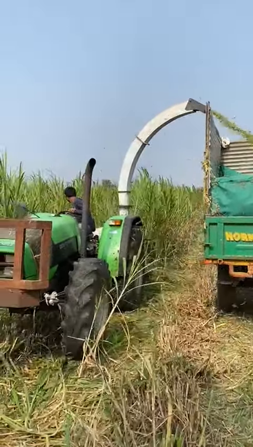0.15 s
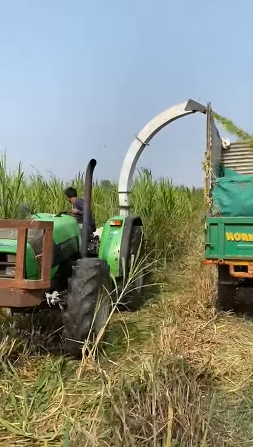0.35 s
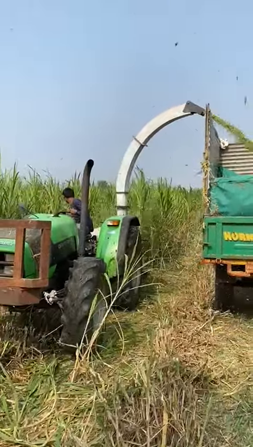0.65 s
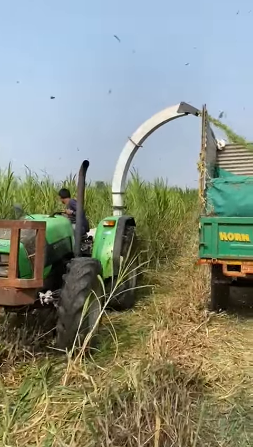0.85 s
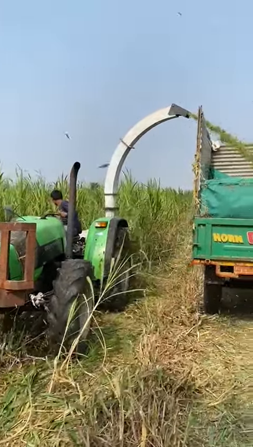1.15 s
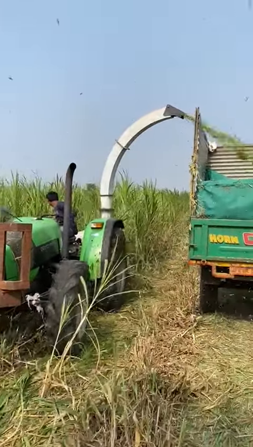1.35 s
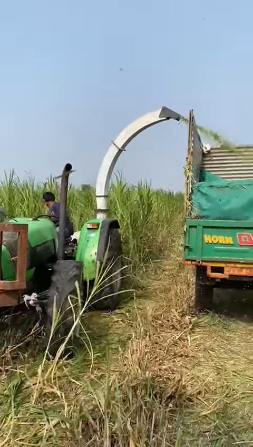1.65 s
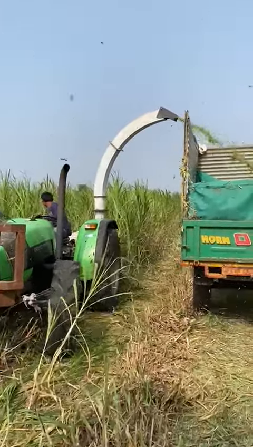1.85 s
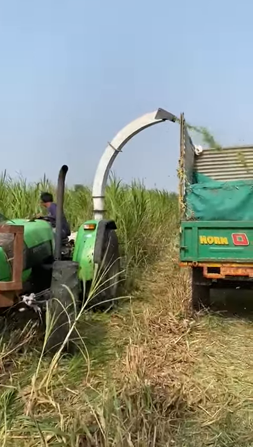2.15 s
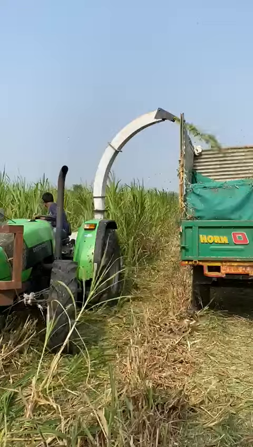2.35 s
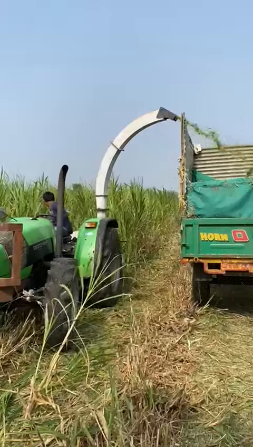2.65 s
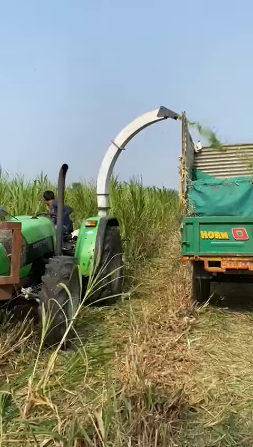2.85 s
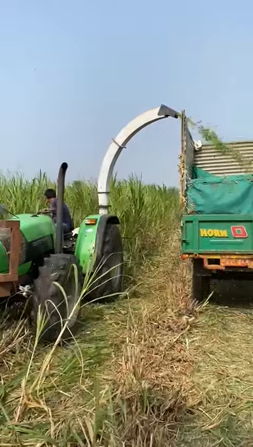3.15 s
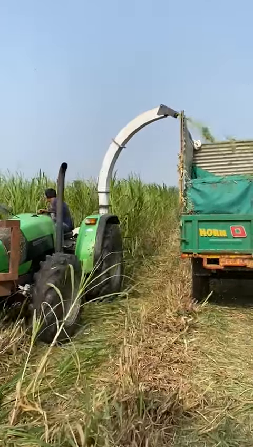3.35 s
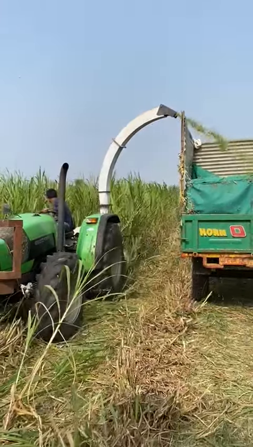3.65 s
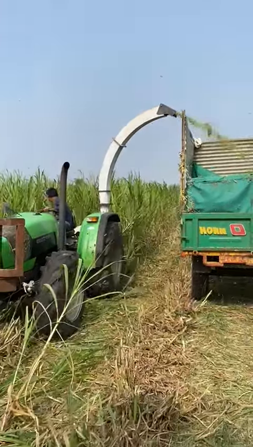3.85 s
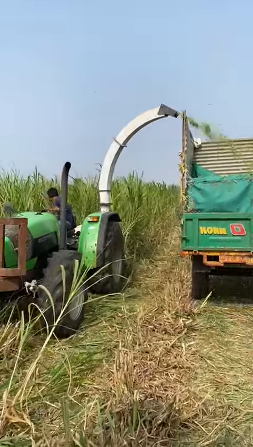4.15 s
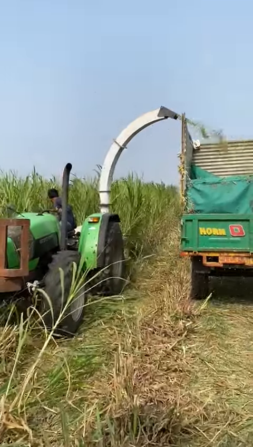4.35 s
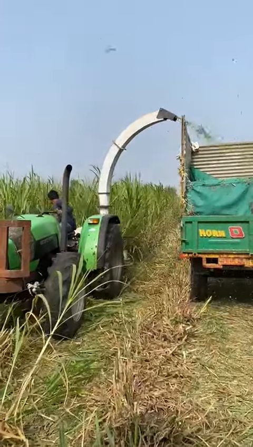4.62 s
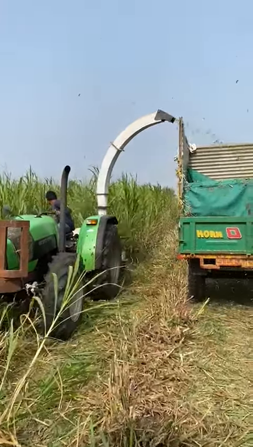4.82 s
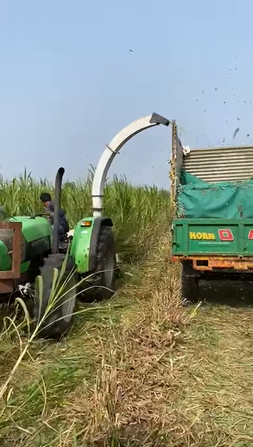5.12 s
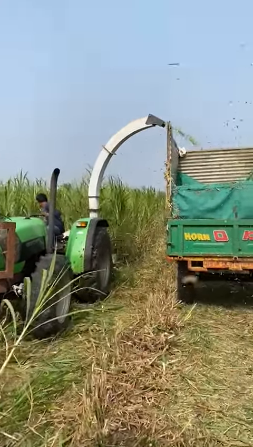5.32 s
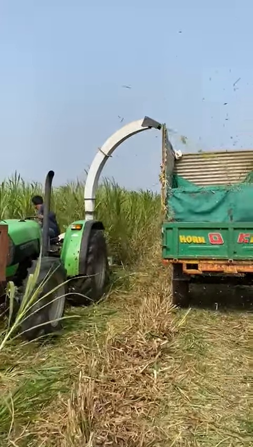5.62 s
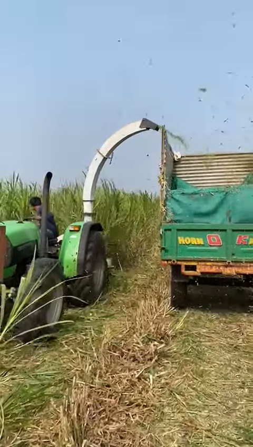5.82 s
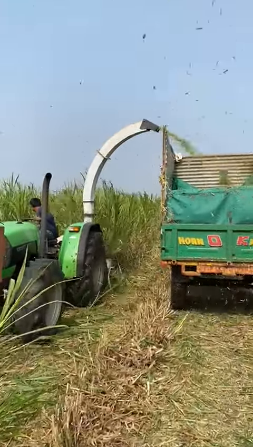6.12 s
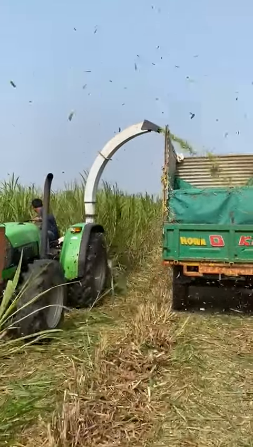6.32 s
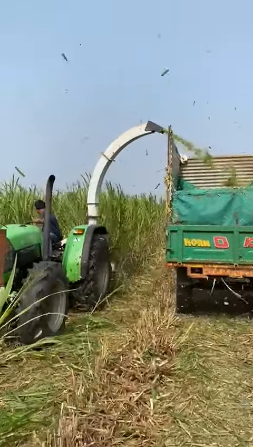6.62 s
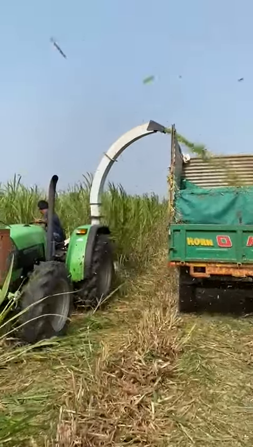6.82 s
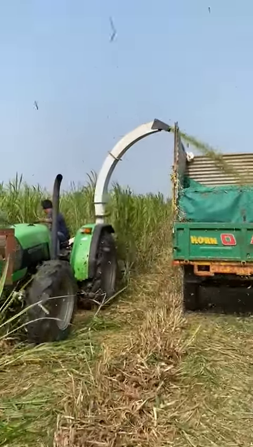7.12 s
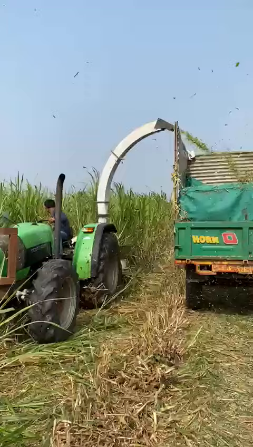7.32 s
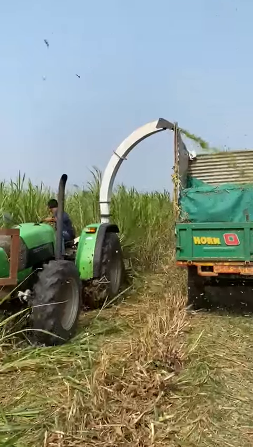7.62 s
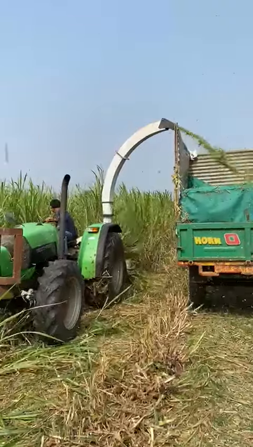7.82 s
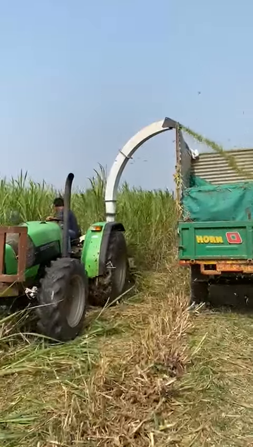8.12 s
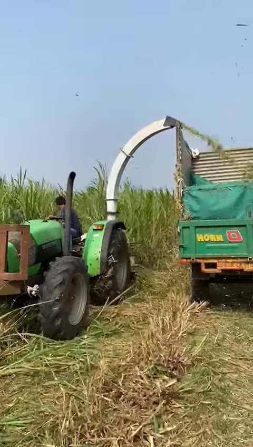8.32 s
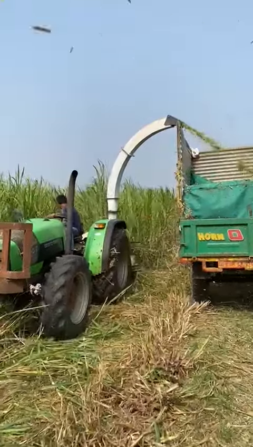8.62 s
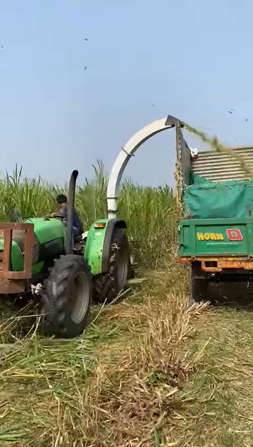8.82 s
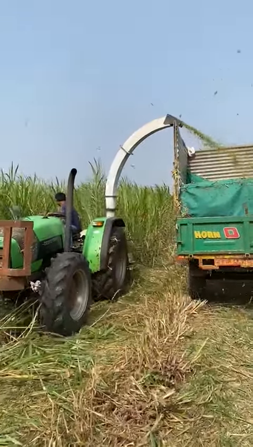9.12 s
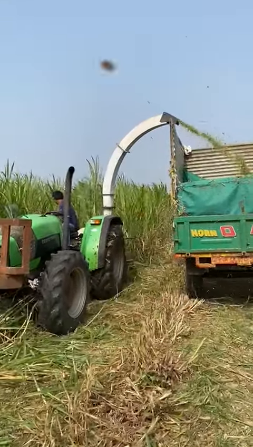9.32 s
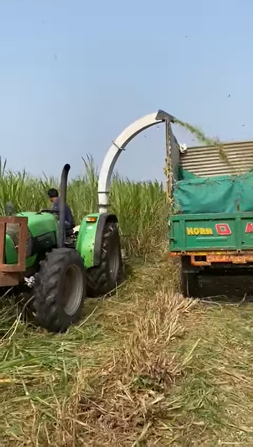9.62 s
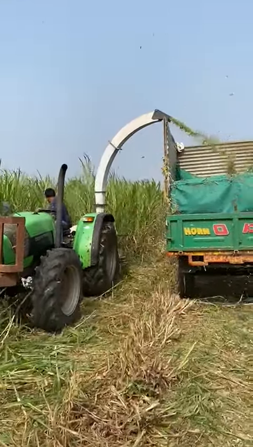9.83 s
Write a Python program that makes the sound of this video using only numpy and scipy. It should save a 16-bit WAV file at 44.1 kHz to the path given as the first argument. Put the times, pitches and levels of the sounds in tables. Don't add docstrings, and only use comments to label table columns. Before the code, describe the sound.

A tractor diesel drones under load while a chopper drum hums, air hisses, and shredded crop patters and rings up a steel spout in clumps.

```python
import sys
import numpy as np
from scipy import signal
from scipy.io import wavfile
from scipy.ndimage import uniform_filter1d, minimum_filter1d

SR = 44100
rng = np.random.default_rng(int(sys.argv[2]) if len(sys.argv) > 2 else 0)


def int16_out(signal):
    q = np.round(np.clip(np.atleast_2d(signal).T, -1, 1) * 32767)
    wavfile.write(sys.argv[1], SR, q.astype(np.int16))


def volts_from_decibels(level):
    exponent = np.asarray(level, float) / 20
    return 10 ** exponent


N = 439677
TIME = np.arange(N) / SR

# time in seconds, firings per second.
ENGINE_SPEED = [(0, 68.1), (.5, 67.08), (1, 66.5), (2, 66.93), (2.5, 67.56), (3.5, 68.46), (4, 69.14),
                (4.5, 70.34), (5, 71.75), (5.5, 72.41), (6, 72.39), (6.5, 71.62), (7, 70.64), (7.5, 70.54),
                (8, 69.9), (8.5, 69.37), (9, 68.9), (10, 68.85)]
FIRING_MULTIPLES = 1, 2, 3, 4, 5, 7, 8
# level in dB, share of effort, share of lean, share of the
# lowest tone's rise and fall, trembling in dB.
EXHAUST_TONES = [(-30.5, 0.1, .01, .99, -0.4), (-42, 1.8, -1.2, -.9, 1), (-26, 0.85, 0.51, .01, 0.1),
                 (-30, .99, -0.9, .01, 0), (-41, 0.24, -1, -0.019, 1.5), (-42, 0.38, 0.81, -0.09, 1.7),
                 (-37.5, -.3, -0.28, -.2, -0.4)]
# time in seconds, effort in dB, lean from the second, fourth and fifth multiples to
# # the third and seventh in dB, rise and fall of the lowest tone's level in dB.
EXHAUST_MOOD = [(.2, -0.5, 1.5, .6), (.6, 1.5, .6, -8), (1, 0, -1.5, 0.5), (1.5, -1, -2, 1),
                (2.15, -1, .6, 2.5), (2.6, -1.5, .8, -0.5), (3.75, 1, 3.5, 4), (4.4, -1, -3.5, -1),
                (5.2, 0, -6, 0.5), (5.8, 2.5, -5, 0.5), (6.7, 3, -1, -4.5), (7.5, 0, 0, -1),
                (8.1, -1, -0.7, -0.5), (8.75, -0.1, 2, 2.5), (9.3, -2.2, 1.5, 0), (9.9, -5.5, 0.5, -2)]
# multiple of the four-firing cycle, level in dB.
CYCLE_TONES = [(3, -47), (5, -49), (6, -49), (9, -48), (11, -49), (13, -47), (15, -45), (17, -47),
               (19, -48), (24, -44), (35, -49), (36, -45), (40, -46), (44, -52), (48, -48), (52, -50)]
# frequency in Hz, density in dB per Hz.
ROAR_SPECTRUM = [(20, -34), (40, -24), (58, -12), (100, -6), (170, -3), (245, -8.5), (400, -4), (560, -5.5),
                 (735, -6), (790, -8.5), (1500, -12), (2400, -15.5), (3000, -19.5), (4000, -43)]

# time in seconds, level in dB.
KNIFE_HUM = [(0, -28), (1.5, -32.5), (3, -29), (4.5, -29), (6, -30.5), (7.5, -26.5), (9, -28), (10, -26)]
# multiple of the drum's turns per second, level in dB, wavering in % of pitch.
DRUM_TONES = [(4, -44, .1), (7, -40, .1), (9, -43, .1), (12, -41, .1), (13, -45, .1), (14, -50, .1),
              (17, -41, .1), (18.9, -42, .3), (21, -44, .3), (40.2, -42, .4), (42, -44, .4)]
# frequency in Hz, density in dB per Hz.
HISS_SPECTRUM = [(1500, -14), (2600, -3), (3300, 0), (4300, 0), (5300, -2), (6000, -3), (6600, -4),
                 (7200, -5), (7800, -6), (8400, -8), (9100, -11), (10500, -10), (11500, -13), (12200, -20)]
# time in seconds, strength in dB.
BLOWER_STRENGTH = [(0, 1.9), (.7, -0.5), (1.5, .4), (2.1, 1), (2.4, -0.5), (3.4, 1.4), (4.1, -1.5),
                   (4.75, -2.5), (5, 0), (5.45, 3), (5.8, 1.5), (6.5, 3.5), (7.2, 2.5), (7.5, 1.5),
                   (7.75, 4), (8.8, 3), (9.5, -0.3), (9.97, 0.9)]

# time in seconds, load in dB.
CROP_LOAD = [(0, 2), (.7, 0.5), (1.15, -2.5), (1.19, 3.5), (1.6, 4), (2.1, 3), (2.45, 1), (2.9, -3.5),
             (3.55, 0.5), (4.3, 1), (4.75, -6.5), (5.6, -1.5), (6.4, 4.5), (6.68, 0.5), (6.74, 4.5),
             (7.22, 3.5), (7.4, -1.5), (8.6, 2.4)]
# start in seconds, hold in seconds, swell in dB.
CROP_CLUMPS = [(.03, 0.065, -3), (0.783, 0.039, 4), (1.186, 0.049, 4.5), (1.364, 0.2, 3), (1.552, .06, 6.5),
               (1.765, .04, 4.5), (1.86, .05, 6), (1.98, 0.02, 4.5), (2.06, 0.036, 5.5), (2.447, .05, 4),
               (3.133, 0.036, 9), (3.3, 0.036, 4), (3.53, 0.12, 7.5), (3.77, .02, 3), (3.848, .02, 3),
               (3.933, 0.037, 11.5), (4.03, 0.018, 6), (4.21, .025, 11.5), (4.437, 0.032, 9),
               (5.42, 0.035, 12.5), (6.025, 0.018, 3.5), (6.153, .03, 3), (6.554, 0.029, 6),
               (6.742, 0.038, 7.5), (6.864, 0.03, 4), (7.036, 0.022, 2), (7.35, .02, 5), (7.89, .02, 4),
               (7.958, 0.053, 7), (8.974, 0.092, 2.5)]
# frequency in Hz, width in Hz, level in dB.
PATTER_MODES = [(820, 370, -3.5), (1190, 500, 1.5), (1600, 470, -1), (2050, 460, -2.5), (2570, 160, -11)]
# frequency in Hz, width in Hz, level in dB.
STEEL_MODES = [(1150, 200, -9), (1900, 150, -9), (2200, 140, 0), (4160, 350, -5.5), (4900, 400, -18)]
# time in seconds, peak level in dB, splinter brightness in dB.
STALK_KNOCKS = [(0.1456, -16.5, -17), (1.1772, -27, -12), (1.29, -18, -18), (1.4207, -22, -17),
                (1.7699, -7, -24), (1.9834, -15, -15), (2.2094, -26, -24), (2.9287, -26, -17),
                (3.1113, -22, -13), (3.3044, -20, -19), (3.8467, -22, -19), (3.9394, -11, -16),
                (4.2143, -25, -4), (4.4393, -16, -18), (5.3722, -19, -13), (5.9409, -21, -16),
                (6.041, -15, -21), (6.568, -19, -19), (6.7496, -9, -26), (7.0376, -21, -18),
                (7.319, -20, -23), (7.4051, -21, -19), (7.5078, -23, -16), (7.6228, -18, -27),
                (7.8494, -17, -13), (7.9718, -11, -18), (8.9979, -14, -16), (9.1361, -17, -17),
                (9.1772, -19, -19), (9.3167, -22, -19)]
# frequency in Hz, width in Hz, level in dB.
SPLINTER_MODES = [(3720, 300, -4), (4140, 270, -1.5)]

# frequency in Hz, density in dB per Hz.
GUST_SPECTRUM = [(25, -17), (60, -7), (100, 1.5), (320, -2), (535, -5), (820, -15), (1200, -19),
                 (2000, -52)]
# frequency in Hz, radians the right port leads, left-right balance in dB, likeness
PORT_PAIR = [(300, .03, -.1, .98), (520, .11, -1.4, .96), (860, .17, -3, .92), (1200, .06, -2.5, .96),
             (1850, 0, 0, .97), (2400, 0, 0, .96), (2950, .46, -3.8, .65),
             (3300, 0, -2.8, .1), (4200, -1.3, -2, .45), (4900, -.05, -.3, .93), (5450, -.1, 0, .93),
                (6050, -1.6, .3, .7), (6750, -3.14, 0, .97), (8150, -3.14, 0, .97), (9600, -6.28, 0, .97)]
# frequency in Hz, step for the sum in dB, step for the difference in dB.
ROUNDING_STEPS = [(120, -26, -11), (500, -21, -18), (1200, -19, -15), (1600, -18, -8), (2200, -18, -7),
                  (3000, -14, -11), (4000, -13, -11), (5100, -13, -4), (5900, -8, -10), (6400, 3, -9),
                  (8750, 6, -6), (9250, -6, 5), (11100, -7, 0), (11900, 6, 9)]

DRUM_TURNS_PER_S = 17.1
FRAME_OFFSET = 370


def evened(x):
    return x / np.sqrt(np.mean(x ** 2) + 1e-20)


def along(rows):
    s, *columns = np.transpose(rows)
    return [np.interp(TIME, s, c) for c in columns]


def read(points, hz):
    f, *columns = np.transpose(points)
    return [np.interp(np.log(hz + 1), np.log(f + 1), c) for c in columns]


def wander(fastest_hz):
    knots = np.arange(0, N / SR + 1, .5 / fastest_hz)
    drift = np.interp(TIME, knots, rng.standard_normal(len(knots)))
    return evened(uniform_filter1d(drift, size=441))


def rush(points, patchy_db):
    hz, frames = np.fft.rfftfreq(2048, 1 / SR), N // 512 + 5
    a, b, patches = rng.standard_normal((frames, 1025, 3)).T
    patches = uniform_filter1d(patches, size=16, axis=0)
    patches = evened(uniform_filter1d(patches, size=8, axis=1))
    level_db = read(points, hz)[0][:, None] + patchy_db * patches
    z = (a + 1j * b) * volts_from_decibels(level_db)
    return evened(signal.istft(z, nperseg=2048, noverlap=1536)[1][:N])


def tone(turns, db, flutter_db):
    level = np.sqrt(2) * volts_from_decibels(db + flutter_db * wander(6.))
    return level * np.sin(2 * np.pi * (turns + rng.random()))


def ringing(blows, modes):
    t = np.arange(1200) / SR
    rings = []
    for hz, width, db in modes:
        decay = np.exp(-np.pi * width * t)
        rings.append(volts_from_decibels(db) * np.sqrt(width / 400) * decay * np.sin(2 * np.pi * hz * t))
    return signal.oaconvolve(blows, np.array(rings), axes=1).sum(0)[:N]


def diesel(load_db, blower_db):
    firings = np.cumsum(along(ENGINE_SPEED)[0]) / SR
    effort_db, lean_db, boom_db = along(EXHAUST_MOOD)
    exhaust = 0
    for k, (db, effort, lean, boom, flutter_db) in zip(FIRING_MULTIPLES, EXHAUST_TONES):
        level_db = db + effort * effort_db + lean * lean_db + boom * boom_db
        exhaust = exhaust + tone(k * firings, level_db, flutter_db)
    uneven = sum(tone(k * firings / 4, db, flutter_db=2.5) for k, db in CYCLE_TONES)
    puffs = 1 + 0.11 * np.cos(2 * np.pi * firings)
    roar_db = -25 + 0.067 * load_db + .45 * blower_db + .3 * wander(9.)
    return exhaust + uneven + volts_from_decibels(roar_db) * puffs * rush(ROAR_SPECTRUM, patchy_db=0.4)


def drum(blower_db):
    turns = DRUM_TURNS_PER_S * TIME
    hum = tone(8 * turns, along(KNIFE_HUM)[0], flutter_db=1.1)
    for k, db, waver_percent in DRUM_TONES:
        pitch = 1 + waver_percent / 100 * wander(1)
        hum += tone(k * DRUM_TURNS_PER_S * np.cumsum(pitch) / SR, db, flutter_db=2)
    throb = 1 + 0.044 * np.cos(2 * np.pi * turns)
    hiss_db = -34 + blower_db + 0.58 * wander(7.)
    return hum + volts_from_decibels(hiss_db) * throb * rush(HISS_SPECTRUM, patchy_db=0.85)


def pieces(rows, per_s, spread_db):
    size = volts_from_decibels(spread_db * np.minimum(rng.exponential(1, (rows, N)), 4))
    hits = rng.random((rows, N)) < per_s / SR
    return hits * size * rng.choice([-1, 1], (rows, N))


def swells():
    rise_s, fall_s = .008, 0.071
    curves = []
    for s, hold_s, db in CROP_CLUMPS:
        curves.append(db * np.interp(TIME - s, [-rise_s, 0, hold_s, hold_s + fall_s], [0, 1, 1, 0]))
    return np.max(curves, axis=0)


def crop(load_db):
    swell_db = swells()
    patter_db = -30.5 + load_db + 0.42 * swell_db + .4 * wander(13.0)
    ring_db = -39 + 1.09 * load_db + swell_db + 0.76 * wander(12.)
    clusters = volts_from_decibels([1.0 * wander(30.) for mode in PATTER_MODES] + 0.38 * wander(30.))
    taps = clusters * pieces(len(PATTER_MODES), per_s=1500., spread_db=2.0)
    patter = evened(ringing(taps, PATTER_MODES))
    bright_taps = volts_from_decibels(1.5 * wander(45.)) * pieces(1, per_s=1200., spread_db=2.0)
    ring = evened(ringing(bright_taps, STEEL_MODES))
    patter_gain = volts_from_decibels(patter_db - 3.0 + 0.49 * (patter_db + 29.5))
    ring_gain = volts_from_decibels(ring_db + 1.2 + .5 * (ring_db + 29))
    return patter_gain * patter + ring_gain * ring


def knocks():
    blows, splinters = np.zeros(N + 3000), np.zeros(N + 3000)
    t = np.arange(3000) / SR
    grits = rng.standard_normal((len(STALK_KNOCKS), 3000))
    for (s, db, bright_db), grit in zip(STALK_KNOCKS, grits):
        start = round(s * SR)
        strike = np.exp(-t / .002) + 0.22 * np.exp(-t / 0.011)
        blows[start:start + 3000] += volts_from_decibels(db - 20.0) * grit * strike
        splinters[start:start + 3000] += volts_from_decibels(db + bright_db - 23.0) * grit * np.exp(-t / 0.014)
    return ringing(blows[None, :N], STEEL_MODES) + ringing(splinters[None, :N], SPLINTER_MODES)


def frames_of(x):
    padded = np.concatenate([np.zeros((*x.shape[:-1], FRAME_OFFSET)), x], axis=-1)
    return signal.stft(padded, SR, window="cosine", nperseg=2048, noverlap=1024)


def samples_of(z):
    x = signal.istft(z, SR, window="cosine", nperseg=2048, noverlap=1024)[1]
    return x[..., FRAME_OFFSET:FRAME_OFFSET + N]


def ports(x):
    hz, t, direct = frames_of(x)
    lead, balance_db, like = (c[:, None] for c in read(PORT_PAIR, hz))
    chance = uniform_filter1d(rng.standard_normal((2, *direct.shape)), size=3, axis=1)
    a, b = uniform_filter1d(chance, size=2, axis=2)
    scattered = 0.96 * direct * np.exp(1j * np.arctan2(a, b))
    right = direct * like * np.exp(1j * lead) + np.sqrt(1 - like ** 2) * scattered
    return samples_of(np.array([direct * volts_from_decibels(balance_db / 2), right * volts_from_decibels(-balance_db / 2)]))


def breeze():
    start_s, rise_s, start_db, growth_db_per_s = 9.02, .018, -28.5, 4.5
    since = TIME - start_s
    level = volts_from_decibels(start_db + growth_db_per_s * since) * np.clip(since / rise_s, 0, 1)
    return np.array([level * volts_from_decibels(2.0 * wander(35.)) * rush(GUST_SPECTRUM, patchy_db=1.5)
                     for port in range(2)])


def scene():
    load_db, blower_db = along(CROP_LOAD)[0], along(BLOWER_STRENGTH)[0]
    machines = diesel(load_db, blower_db) + drum(blower_db) + crop(load_db) + knocks()
    return ports(machines) + breeze()


def rounded(pair):
    bins, front = 552, FRAME_OFFSET + 1024
    n, k = np.arange(2048)[:, None], np.arange(bins)
    window = signal.windows.kaiser_bessel_derived(2048, 4 * np.pi)[:, None]
    basis = window * np.cos(np.pi / 1024 * (n + 512.5) * (k + .5)) / np.sqrt(512)
    padded = np.pad(pair, ((0, 0), (front, 2048 - (front + N) % 1024)))
    halves = padded.reshape(2, -1, 1024)
    lines = np.concatenate([halves[:, :-1], halves[:, 1:]], axis=2) @ basis
    stronger = np.sqrt(uniform_filter1d(lines ** 2, size=32, axis=2).max(0) + 1e-18)
    masker = minimum_filter1d(stronger, size=16, axis=1)
    budget_db = 4.2 * rng.standard_normal((*lines.shape[:2], bins // 12)).repeat(12, axis=2)
    step = masker * volts_from_decibels(np.array(read(ROUNDING_STEPS, k * SR / 2048))[:, None] + budget_db)
    blocks = lines.reshape(*lines.shape[:2], -1, 12)
    block_rms = np.sqrt((blocks ** 2).mean(-1)).repeat(12, axis=2)
    kept = block_rms > .4 * step
    coarse = kept * np.sign(lines) * np.floor(abs(lines) / step + .4) * step
    frames = coarse @ basis.T
    lapped = frames[:, 1:, :1024] + frames[:, :-1, 1024:]
    return lapped.reshape(2, -1)[:, FRAME_OFFSET:FRAME_OFFSET + N]


def band_limit(x):
    return signal.sosfilt(signal.butter(12, 12500, fs=SR, output="sos"), x)


def record(dry):
    pair = np.array([dry[0] + dry[1], dry[0] - dry[1]]) / 2
    both, apart = rounded(pair)
    return band_limit(np.array([both + apart, both - apart]))


dry = scene()
out = record(dry)
int16_out(out)
```